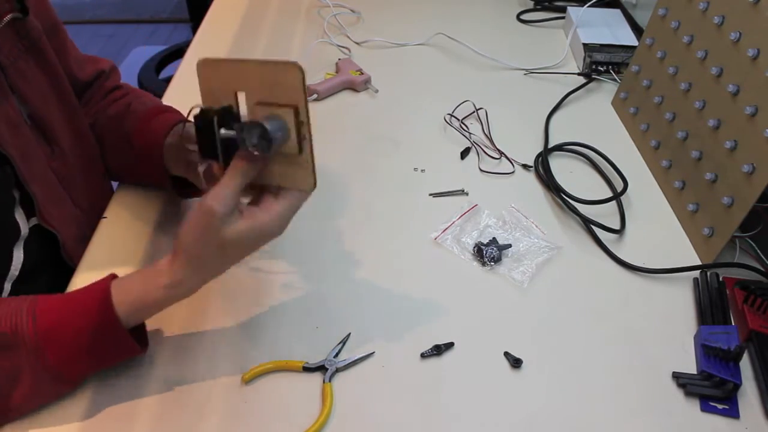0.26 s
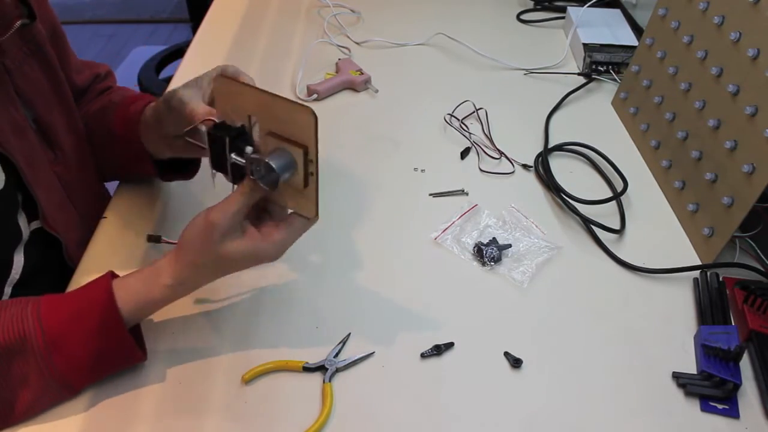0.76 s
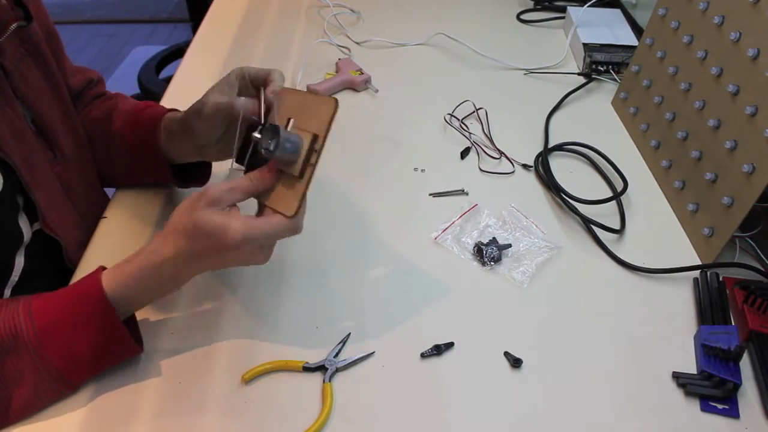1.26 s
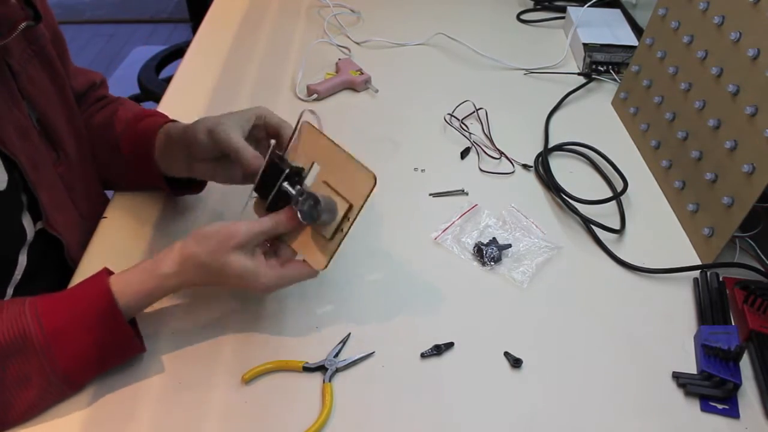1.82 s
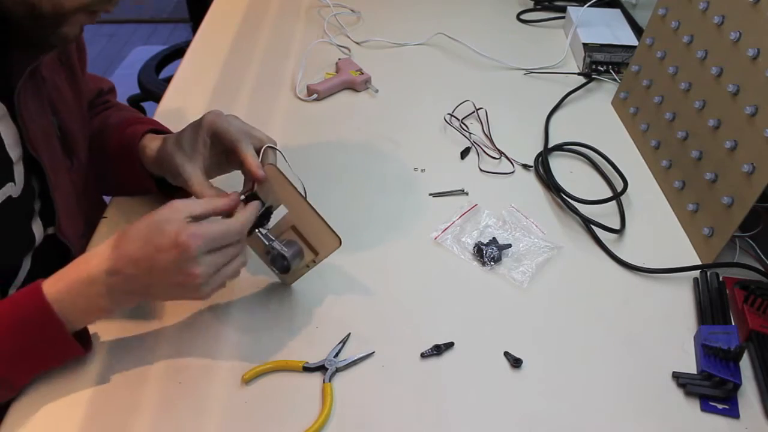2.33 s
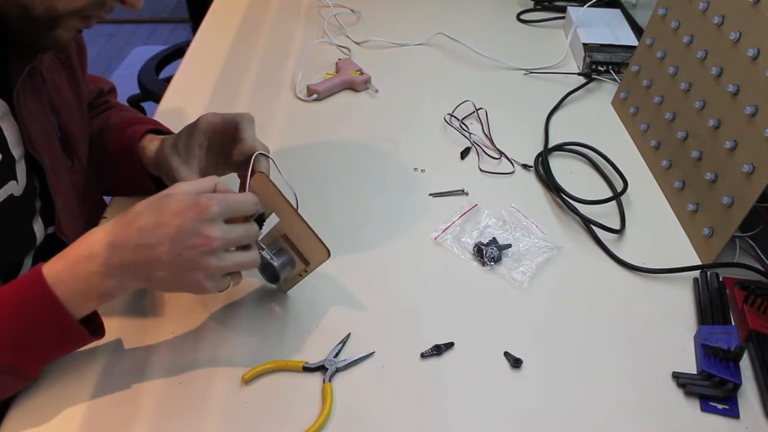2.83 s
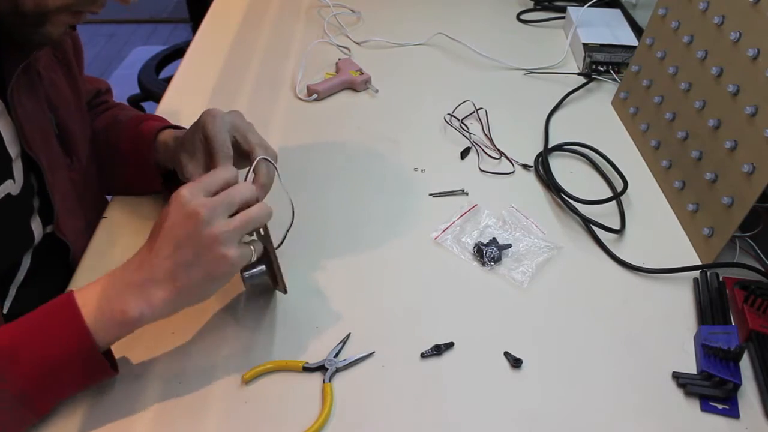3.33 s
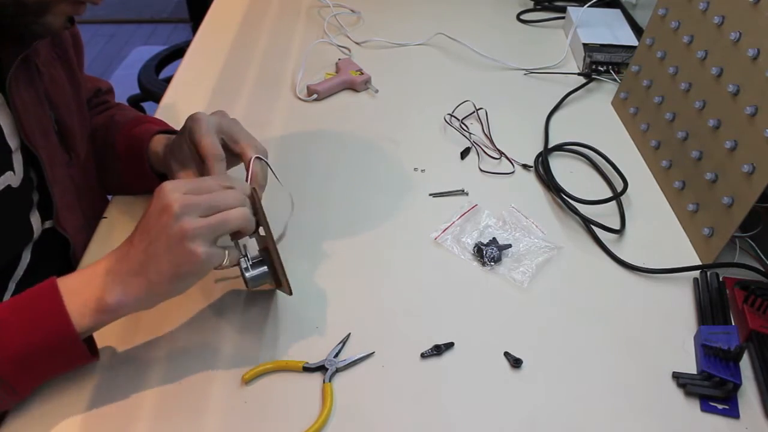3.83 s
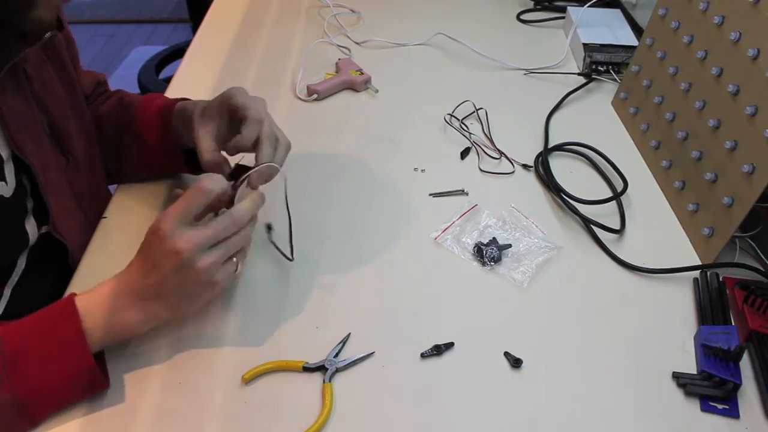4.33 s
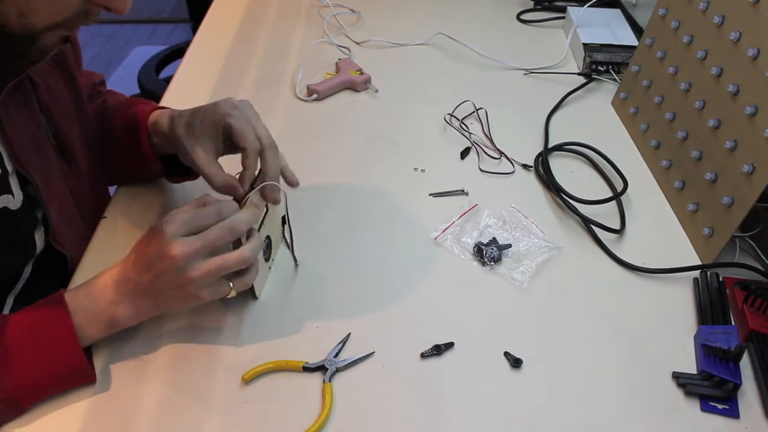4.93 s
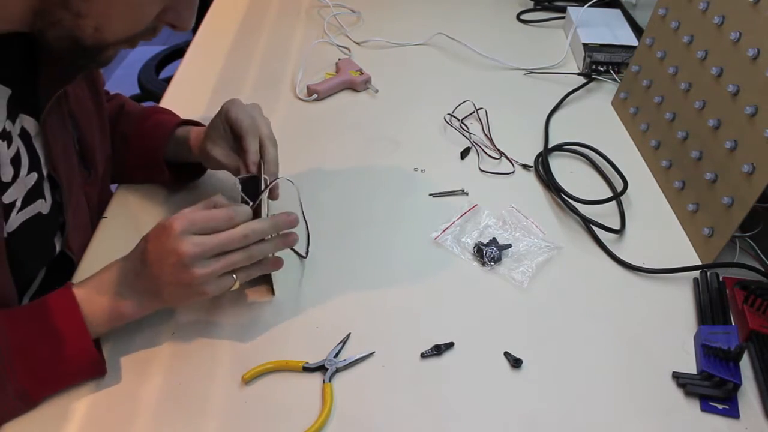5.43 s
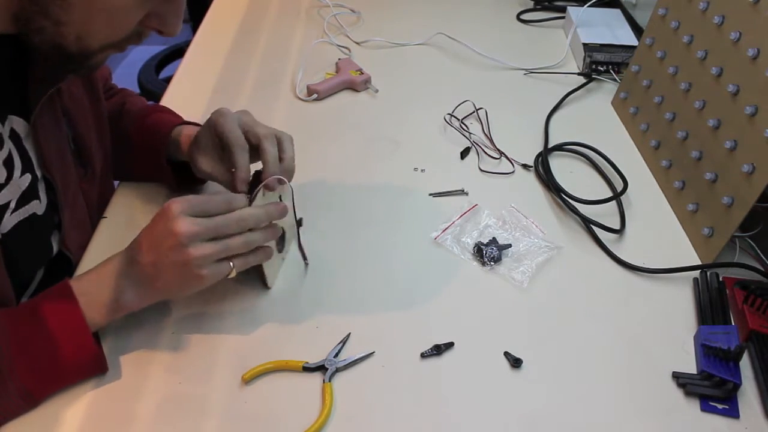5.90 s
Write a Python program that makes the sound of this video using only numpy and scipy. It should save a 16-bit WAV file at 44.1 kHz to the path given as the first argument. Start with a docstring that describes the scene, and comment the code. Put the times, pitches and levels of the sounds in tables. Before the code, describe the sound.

Hands work a stiff plastic tie through a small thin wooden board: faint ticks and scrapes, then sharper snaps and crackles over soft fan hiss.

```python
"""A small workshop: over a desk, hands thread a nylon zip tie through a small plywood board.
The tie ticks and snaps on edges and scrapes through holes: short rough pushes ring board, strap and teeth.
Fingers rub the wood as a low murmur, the tie crackles in tiny slips, and the board bumps the desk.
Behind it a fan makes shaped noise with faint wavering tones; a far motor whines upward once
and one soft thud, a swelling low tone, comes from outside the room."""
import sys
import numpy as np
from scipy import signal
from scipy.fft import rfft, irfft
from scipy.io import wavfile
from scipy.ndimage import uniform_filter1d

SR = 44100
rng = np.random.default_rng(int(sys.argv[2]) if len(sys.argv) > 2 else 0)


def materialize(psi):
    """Save the field psi as 16-bit PCM at rate SR to the path in sys.argv[1].

    A 1-D psi becomes a single channel; in a 2-D psi each row is a channel.
    """
    bounded = np.clip(np.atleast_2d(psi).T, -1, 1)
    quanta = np.round(bounded * 32767).astype(np.int16)
    wavfile.write(sys.argv[1], SR, quanta)


N = 271656  # length in samples

# Sharp ticks and snaps. Each row: start in seconds, relative force in dB,
# relative share of the board in dB, relative share of the teeth in dB.
TICKS = [(.07, -40, -27, 3), (.35, -46, -25, 0), (0.3983, -37, -13, -7), (0.5657, -36.5, -19, -5),
         (0.6607, -34, -13, -23), (0.8282, -25.5, -31, -7.5), (1.0721, -31, -18, -8),
         (1.1147, -30.5, -22, -10), (1.1765, -34, -23, -25), (1.4984, -22.5, -16, -13.5),
         (1.549, -34, -22, -8), (1.572, -29, -34, -6), (1.578, -34, -32, -9), (1.6161, -35.5, -3, 2),
         (1.698, -21.5, -24, -18), (1.8893, -31, -37, -17), (2.1844, -25, -20.5, -7.5),
         (2.6698, -28, -35, -11), (3.1506, -33, -12, -8), (3.3575, -34, -6.5, -19),
         (3.4044, -23, -20.5, -4.5), (3.7462, -35.5, -7, -20), (3.803, -41, -15, -8),
         (3.903, -32, 7.5, -17), (3.915, -35, -13, -3), (4.1212, -37.5, 7.5, 6), (4.1383, -11, -5, -9.5),
         (4.153, -20, -5, -22), (4.1793, -16.5, -23, -11), (4.4094, -25, -23, 5.5),
         (4.4428, -11.5, -4.5, -35), (4.4533, -18, -6, -29), (4.47, -36, -8, 0), (4.505, -42, -14, -3),
         (4.6337, -38, -3, -15), (4.6534, -30.5, -18, 5.5), (4.679, -41, -15, -9), (4.7292, -20, -2, -27),
         (4.7567, -32, -21, -6), (4.779, -42, -15, -5), (4.7892, -37, -23, -8), (4.804, -35, -15, 2.5),
         (4.8242, -2, -15.5, -18.5), (4.9261, -29, -2, -17), (4.9394, -38, 6, -19),
         (5.151, -19.5, -7, -12.5), (5.189, -24, -5, -37), (5.4772, -32, -12, -14), (5.633, -35.5, 0, -2),
         (5.739, -31.5, -12, -2.5), (5.7605, -54, -14, -12), (5.7776, -23, -8, -11), (5.785, -28, -1, -7),
         (5.7904, -26, -7, -1), (5.8425, -43, -17, -3), (5.848, -14, -18, -12.5), (5.8659, -30, -7, 2),
         (5.966, -26.5, -2.5, 5), (5.982, -16.5, -5, -35.5), (6.0516, -8.5, -8.5, -12.5)]
# Slips and scrapes. Each row: time in seconds, relative force in dB, relative share of the board's
# bending in dB, relative share of the strap in dB, pitch where the edges ring best in Hz,
# time from start to crest in seconds.
SCRAPES = [(0.053, -49.5, -20, -4, 1840, 0.0064), (0.655, -51, -25, -11, 4250, 0.011),
           (.823, -42, -25, -23, 4300, 0.0039), (.99, -53.5, -25, 0.5, 1900, 0.0041),
           (1.224, -54, -25, 6, 1910, 0.0038), (1.6, -52, -20, -4.5, 1950, 0.012),
           (1.694, -50, -22, 3, 2160, 0.0065), (2.148, -53, -9, -4, 1800, 0.0062),
           (2.375, -50, 7, -15, 1790, 0.0034), (2.828, -44, -6, -16, 2140, 0.0057),
           (3.023, -42.5, 0, -14, 2160, 0.0022), (3.149, -47, -10.5, -15.5, 2270, 0.017),
           (3.234, -34, -10, -22, 1920, 0.013), (3.353, -32.5, -17, -15.5, 2300, 0.009),
           (3.433, -39.5, -5, -18, 2470, 0.0049), (3.682, -34, -15, -20, 1920, 0.011),
           (3.742, -35, -7.5, -20, 2030, 0.0085), (3.789, -43, -12, -18, 2450, 0.0083),
           (3.855, -41, -9.5, -49.5, 2280, 0.011), (3.909, -35, -16, -21, 2120, 0.0077),
           (4.01, -33, -15.5, -24.5, 2100, 0.0046), (4.134, -21, -18.5, -17, 1960, 0.0042),
           (4.142, -16.5, -43, -11.5, 1680, 0.0067), (4.454, -25, -11, -12, 2310, 0.0041),
           (4.56, -30.5, -10.5, -18, 2840, 0.012), (4.674, -40.5, -11, -25, 3070, 0.0068),
           (4.703, -40, -24, -17, 2260, 0.0091), (4.721, -24, -28, -20.5, 2580, 0.011),
           (4.834, -21, -31, -39, 2950, 0.0048), (4.969, -39, -17, -36, 3330, 0.0047),
           (4.98, -35, -15.5, -21, 2580, 0.0081), (5.034, -30.5, -23, -21.5, 2720, 0.0057),
           (5.056, -31.5, -19.5, -35, 2580, .005), (5.113, -30, -18.5, -17.5, 3220, 0.0065),
           (5.222, -33.5, -13, -20, 2970, 0.0065), (5.257, -39, -14, -27, 2640, 0.0051),
           (5.325, -37, -11.5, -17.5, 3500, 0.0043), (5.423, -48, -11, -15, 2540, 0.0069),
           (5.524, -31, -26, -22, 2580, 0.0055), (5.584, -33.5, -9, -18, 2830, 0.0085),
           (5.669, -34.5, -16, -22, 3060, 0.005), (5.806, -26, -18, -20, 3250, 0.0038),
           (5.896, -37, -28, -22, 3140, 0.0079), (5.935, -27, -20.5, -15, 3040, 0.01),
           (5.969, -17, -44, -13.5, 2750, 0.011), (6.012, -28.5, -21, -10.5, 3600, 0.0046),
           (6.061, -25.5, -21, -15, 3260, 0.0053), (6.075, -21, -46, -19.5, 2800, 0.0064),
           (6.148, -36, -13, -20, 3400, 0.013)]
# How the work is held. Each row: time in seconds, favoured pitch of the strap in Hz,
# favoured pitch of the teeth in Hz, bending against edges in a tick in dB.
GRIP = [(0, 7000, 9500, 3), (.7, 7300, 13900, -4), (1, 7460, 11300, 8), (1.5, 6960, 14200, -8),
        (1.9, 6800, 14200, -6), (2.2, 6560, 9600, 3), (2.7, 7400, 10800, 4), (3.15, 6240, 14600, -10),
        (3.36, 4600, 14300, 2), (3.41, 5500, 14100, 12), (4.14, 4500, 12900, -10.5), (4.4, 5000, 9300, -18),
        (4.65, 5480, 10400, -9), (4.8, 5500, 9800, -10.5), (5.2, 5400, 10300, -10), (5.55, 5430, 13700, 1),
        (5.76, 5000, 10000, -2.5), (6.16, 5250, 10200, -12)]
# What rings: the bending board, its edges, the strap, its teeth and the desk top.
# Each row: pitch in Hz, relative level in dB, time to fade by 60 dB in seconds.
BENDING_MODES = [(614, 1, 0.028), (894, 7.5, 0.073), (1189, 18, 0.014), (1298, 16.5, 0.011),
                 (1370, 13.5, 0.025)]
EDGE_MODES = [(1560, -7.5, .02), (1827, -1, 0.026), (2182, 4.5, 0.026), (2450, 6, 0.012),
              (2670, 2.5, 0.024), (3022, 3, 0.018), (3434, 8.5, 0.014), (4335, 7.5, 0.0097)]
STRAP_MODES = [(3800, -6, .004), (4350, -5, .004), (4900, 0, .003), (5610, 1, .004), (6400, 0, .0025),
               (7300, 0, .0025), (8400, -1, .002)]
TEETH_MODES = [(9400, -4, 0.0023), (9670, 19, 0.0022), (10440, 18, 0.00099), (12100, -7, 0.0074),
               (13950, 17, 0.00065), (14550, 13, 0.0053)]
DESK_MODES = [(200, -4, 0.07), (324, 3.5, 0.033), (466, 13.5, 0.033)]
# How long the room rings. Each row: pitch in Hz, time to fade by 60 dB in seconds.
ROOM_FADE = [(400, 0.046), (1060, 0.16), (2790, 0.13), (7350, 0.13), (14000, 0.098)]
# Early echoes, the strongest about 9 ms after each sound.
# Each row: delay in seconds, level against the whole tail in dB.
EARLY_ECHOES = [(.0092, -9.5), (0.0129, -17)]
# Colour of the fan's hiss. Each row: pitch in Hz, relative level per Hz in dB.
HISS_COLOUR = [(25, -59), (70, -62), (95, -30), (110, -18.5), (190, -23.5), (290, -12), (480, -6.5),
               (700, -3.5), (1230, -2), (2050, -5.5), (4030, -9), (6560, -13.5), (12000, -17), (16000, -21)]
# Faint fan tones. Each row: middle pitch in Hz, middle level in dB.
FAN_TONES = [(236, -82.5), (371, -85), (470, -76), (850, -76), (898, -70), (1276, -71.5), (1793, -71),
             (1879, -76), (2821, -75.5), (4097, -74.5)]
# Fingers sliding on the board, one list a rub.
# Each row: time in seconds, level of the murmur before the low cut in dB.
RUBS = [
    [(3.2, -69), (3.768, -65), (3.85, -53.5), (4.1, -113)],
    [(4.45, -60), (4.5, -62), (4.648, -56), (4.844, -68), (5.164, -56.5), (5.4, -66.5)],
    [(5.5, -63), (5.628, -61.5), (5.78, -67.5), (6.092, -50.5), (6.16, -94)],
]
# A soft far thud, one row: start in seconds, pitch in Hz, peak level in dB,
# time from start to crest in seconds.
FAR_THUD = (.345, 74, -80, .035)
# The board bumps the desk. Each row: start in seconds, level before the low cut in dB.
DESK_BUMPS = [(2.373, -65), (4.134, -59), (4.444, -66.5), (4.827, -74)]

HISS_DB = -56
WHINE_HZ, WHINE_RISE_HZ_PER_S, WHINE_DB, WHINE_END_S = 280, 230, -75.5, 0.83
TICK_STRAP_DB, SCRAPE_EDGES_DB = -10.5, -11  # shares that stay the same in every tick, every scrape
# teeth against strap in a scrape; scrapes harder than SOFT_DB lose teeth sound and are duller
SCRAPE_TEETH_DB, DULL_DB_PER_DB, SOFT_DB = -0.5, 0.34, -36.5
EVENNESS = 0.8  # 0: the push decides what each mode gets; 1: each mode keeps its own share
CLAMP_S = 4.45  # from here the tie is threaded and crackles when rubbed; before, its loose end stirs
CRACKLES_PER_S, CRACKLE_DB = 78, 3  # level against the rubbing murmur
STIRS_PER_S, STIR_DB = 42, -70.5  # level before the low cut
ROOM_DB = -6.0
TOP_HZ = 15900  # highest pitch kept


def gain_of(db):
    """Turns decibels into a gain."""
    return 10 ** (np.asarray(db) / 20)


def evened(x):
    """Scales a signal to an rms level of 1."""
    return x / np.sqrt(np.mean(x ** 2) + 1e-20)


def read(points, hz):
    """Reads a table between its rows, on a log pitch axis."""
    f, value = np.transpose(points)
    return np.interp(np.log(hz + 1), np.log(f + 1), value)


def add(mix, start_s, sound):
    """Mixes a sound in at its start time, cut off at the end of the mix."""
    part = mix[:, round(start_s * SR):][:, :sound.shape[1]]
    part += sound[:, :part.shape[1]]


def low_cut(x, order, hz):
    """Takes away the bass below a given pitch."""
    return signal.sosfilt(signal.butter(order, hz, "highpass", fs=SR, output="sos"), x)


def swelling(t, crest_s):
    """A push that grows to 1 at its crest and then dies away."""
    u = t / crest_s
    return u * np.exp(1 - u)


def fan():
    """Noise shaped by pitch, with drifting louder patches, plus faint tones wavering in pitch and level."""
    frames, hz = N // 512 + 5, np.fft.rfftfreq(2048, 1 / SR)
    real, imaginary, patches = rng.standard_normal((frames, 1025, 3)).T
    patches = uniform_filter1d(patches, 20, 0)  # wide in pitch
    patches = evened(uniform_filter1d(patches, 6, 1))  # and long in time
    colour_db = read(HISS_COLOUR, hz)[:, None] + 0.63 * patches
    spectrum = (real + 1j * imaginary) * gain_of(colour_db)
    hiss = signal.istft(spectrum, nperseg=2048, noverlap=1536)[1][:N]
    out = gain_of(HISS_DB) * evened(hiss)
    for hz, db in FAN_TONES:
        pitch_drift, level_drift = rng.standard_normal((2, N))
        wobble = 1 + 0.001236 * evened(uniform_filter1d(pitch_drift, 4000))
        swell_db = 2.0 * evened(uniform_filter1d(uniform_filter1d(level_drift, 1500), 1500))
        tone = np.sin(2 * np.pi * np.cumsum(hz * wobble) / SR)
        out = out + np.sqrt(2) * gain_of(db + swell_db) * tone
    return out


def far_motor():
    """A sine that rises steadily in pitch, flickers in level and fades out."""
    t = np.arange(N) / SR
    flicker_db = 2.5 * evened(uniform_filter1d(rng.standard_normal(N), 4000))
    fade = np.clip((WHINE_END_S - t) / 0.13, 0, 1)
    tone = np.sin(2 * np.pi * np.cumsum(WHINE_HZ + WHINE_RISE_HZ_PER_S * t) / SR)
    return np.sqrt(2) * fade * gain_of(WHINE_DB + flicker_db) * tone


def ring(modes, shift, near_hz, damp_db):
    """Each mode of a part answers a blow as a fading sine, damped per octave away from near_hz."""
    t = np.arange(2048) / SR
    hz, db, t60 = np.transpose(modes)[:, :, None]
    db = db - damp_db * np.abs(np.log2(hz / near_hz))
    sign = (-1) ** np.arange(len(modes))[:, None]  # neighbours in opposite phase leave no holes between
    onset = 1 - np.exp(-t * hz / 0.4)  # a mode builds up over its first cycle
    fade = gain_of(db - 60 * t / t60) / np.sqrt(t60)
    tone = np.sin(2 * np.pi * hz * shift[:len(modes), None] * t)
    return sign * onset * fade * tone


def ring_held(modes, near_hz, damp_db):
    """The summed ring of one part, with its pitches left unshifted."""
    return ring(modes, np.ones(8), near_hz, damp_db).sum(0)


def slip_sounds():
    """Strap and teeth ring while one tiny slip drags, a short fading burst of noise."""
    strap = ring_held(STRAP_MODES, 6500, damp_db=23)
    teeth = ring_held(TEETH_MODES, 12800, damp_db=12)
    drag = rng.standard_normal((2, 600)) * np.exp(-np.arange(600) / SR / 0.0082)
    strap = evened(np.convolve(strap, drag[0])[:2048])
    teeth = evened(np.convolve(teeth, drag[1])[:2048])
    return strap, teeth


def tiny_slips(per_s, sound):
    """Tiny slips at random moments and of random size, each making the same sound."""
    size = gain_of(3.5 * np.minimum(rng.exponential(1, N), 3))
    slips = size * (rng.random(N) * SR < per_s)
    return evened(signal.fftconvolve(slips, sound)[:N])


def stir(strap, teeth):
    """The loose end of the tie stirs faintly in tiny slips until it is threaded."""
    loose = np.arange(N) / SR < CLAMP_S
    return loose * gain_of(STIR_DB) * tiny_slips(STIRS_PER_S, teeth + strap)


def excite(push, modes):
    """A push rings the modes; however rough it is, each mode keeps most of its own share of energy."""
    free = rfft(modes, 5120)
    driven = free * rfft(push, 5120)
    luck = np.linalg.norm(driven, axis=1) / np.linalg.norm(free, axis=1)
    return irfft((driven / luck[:, None] ** EVENNESS).sum(0))


def grip(s):
    """Favoured pitch of edges, strap and teeth, and how freely the board bends, as the grip changes."""
    scrapes, (times, *held) = np.transpose(SCRAPES), np.transpose(GRIP)
    edge_hz = np.interp(s, scrapes[0], scrapes[-2])
    return [edge_hz] + [np.interp(s, times, column) for column in held]


def touch(force_db, shares_db, grip_hz, swell, grit_db):
    """Uneven slips, clumped in millisecond bursts under the swell of a push, drive all four parts."""
    noise, size = rng.standard_normal((2, 4096))
    shift = 1 + 0.032 * rng.standard_normal(40)  # each touch moves the pitches a little
    clumps = evened(uniform_filter1d(size, 60))
    push = swell * noise * gain_of(grit_db * clumps + 3.1 * size)
    edge_hz, strap_hz, teeth_hz = grip_hz
    # the free strap rings on fewer modes than the clamped one
    strap_damp_db = np.interp(strap_hz, (5500, 7000), (4.5, 18))
    rings = (ring(BENDING_MODES, shift, 1400, damp_db=7.5),
             ring(EDGE_MODES, shift[8:], edge_hz, damp_db=20),
             ring(STRAP_MODES, shift[16:], strap_hz, damp_db=strap_damp_db),
             ring(TEETH_MODES, shift[24:], teeth_hz, damp_db=16))
    sound = 0
    for modes, share_db in zip(rings, shares_db):
        part = excite(push, modes)
        sound = sound + gain_of(share_db) * part / np.linalg.norm(part)
    return gain_of(force_db) * np.linalg.norm(swell) * sound[None]


def scrapes(rows):
    """A slip swells to its crest and dies away; hard scrapes ring the teeth less."""
    t = np.arange(4096) / SR
    for k, (s, db, bend_db, strap_db, _, crest_s) in enumerate(SCRAPES):
        dull_db = DULL_DB_PER_DB * max(db - SOFT_DB, 0)
        shares = bend_db, SCRAPE_EDGES_DB, strap_db, strap_db + SCRAPE_TEETH_DB - dull_db
        swell = swelling(t, crest_s) ** 1.38
        sound = touch(db, shares, grip(s)[:3], swell, grit_db=-3.5)
        add(rows[k % 3][None], s - 0.004, sound)  # starts 4 ms before the listed time


def ticks(rows):
    """A snap starts almost at once and dies away; harder snaps chatter longer."""
    t = np.arange(4096) / SR
    for k, (s, db, board_db, teeth_db) in enumerate(TICKS):
        *grip_hz, bend_db = grip(s)
        fade_s = 0.0024 * gain_of(0.24 * db)
        snap = (1 - np.exp(-t / 0.00034)) * np.exp(-t / fade_s)
        shares = board_db + bend_db, board_db, TICK_STRAP_DB, teeth_db
        add(rows[k % 3][None], s, touch(db, shares, grip_hz, snap, grit_db=-2.5))


def rub(strap, teeth):
    """Skin dragging over plywood makes its low modes murmur; the threaded tie slips in tiny crackles."""
    t = np.arange(N) / SR
    skin = rng.standard_normal(N) * gain_of(12.5 * rng.standard_normal(N))
    murmur = evened(signal.fftconvolve(skin, ring_held(BENDING_MODES, 1500, damp_db=40))[:N])
    edges = evened(ring_held(EDGE_MODES, 2270, damp_db=11))
    slip = edges + gain_of(-6.5) * strap + gain_of(-7) * teeth
    crackle = (t > CLAMP_S) * gain_of(CRACKLE_DB) * tiny_slips(CRACKLES_PER_S, slip)
    level = sum(gain_of(np.interp(t, *np.transpose(points), left=-150, right=-150)) for points in RUBS)
    return level * (murmur + crackle)


def hands():
    """All the handwork: touches dealt in turn to three rows, rubbing and stirring in the first."""
    rows = np.zeros((3, N))
    strap, teeth = slip_sounds()
    rows[0] += stir(strap, teeth)
    scrapes(rows)
    ticks(rows)
    rows[0] += rub(strap, teeth)
    return low_cut(rows, 4, 300)  # small parts radiate no bass


def room(x):
    """Dense reflections, random anew for each row, each band dying at its own speed, plus early echoes."""
    taps = np.zeros((len(x), SR // 2))
    at = np.arange(150, SR // 2 - 12, 12)
    shape = (len(x), len(at))
    places = at + rng.integers(0, 12, shape)
    np.put_along_axis(taps, places, rng.choice([-1., 1.], shape), 1)
    taps *= np.minimum(np.arange(SR // 2) / SR / 0.01, 1) ** 0.7  # builds up over 10 ms
    hz, t, bands = signal.stft(taps, SR, nperseg=128)
    fade = gain_of(-60 * t / read(ROOM_FADE, hz)[:, None])
    tail = signal.istft(bands * fade, SR, nperseg=128)[1]
    tail = tail / np.linalg.norm(tail[0])
    for delay_s, db in EARLY_ECHOES:
        add(tail, delay_s, gain_of(db) * np.ones((len(x), 1)))
    return signal.fftconvolve(x, tail, axes=1)[:, :N]


def far_thud():
    """A low sine swells softly and dies away, outside the room."""
    t = np.arange(N) / SR
    start_s, hz, db, crest_s = FAR_THUD
    swell = swelling(np.maximum(t - start_s, 0), crest_s) ** 2
    return gain_of(db) * swell * np.sin(2 * np.pi * hz * t)


def desk():
    """Each bump is a short rough push into the low modes of the desk top."""
    out, t = np.zeros((1, N)), np.arange(2048) / SR
    top = ring_held(DESK_MODES, 420, damp_db=-1.0)
    for start_s, db in DESK_BUMPS:
        push = swelling(t, 0.0035) * rng.standard_normal(2048)
        bump = evened(signal.fftconvolve(push, top))
        add(out, start_s, gain_of(db) * bump[None])
    return low_cut(out, 2, 240)  # the microphone hears little of the deepest thump


def scene():
    """Hands close by with their reflections, desk bumps, the fan and the far sounds."""
    near = hands()
    handwork = (near + gain_of(ROOM_DB) * room(near)).sum(0, keepdims=True)
    return handwork + desk() + fan() + far_motor() + far_thud()


def record(dry):
    """Limits the band: a steep filter takes away the highest treble."""
    treble_cut = signal.firwin(511, TOP_HZ, window=("kaiser", 9), fs=SR)
    return signal.oaconvolve(dry, treble_cut[None], "same")


dry = scene()
out = record(dry)
materialize(out)
```